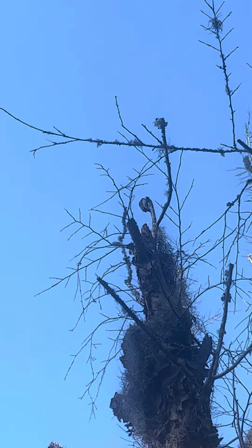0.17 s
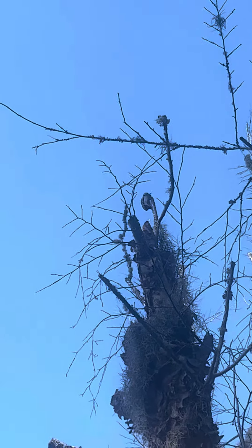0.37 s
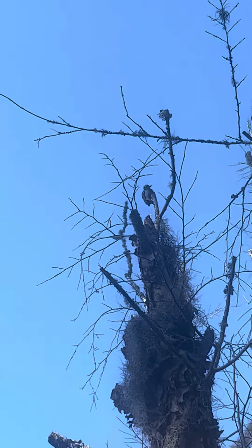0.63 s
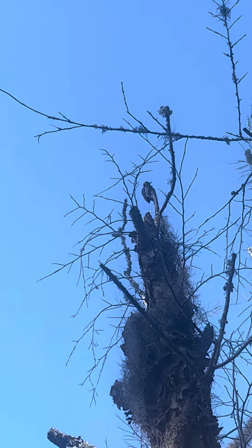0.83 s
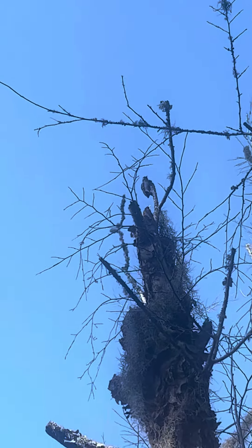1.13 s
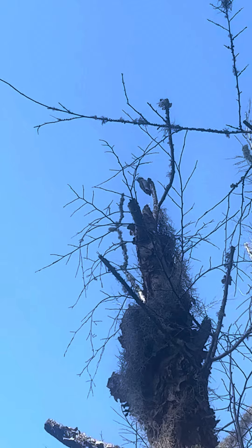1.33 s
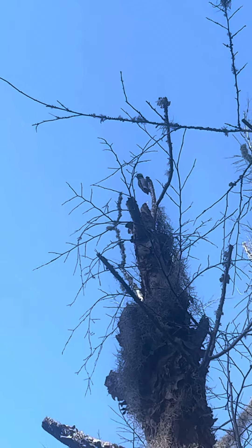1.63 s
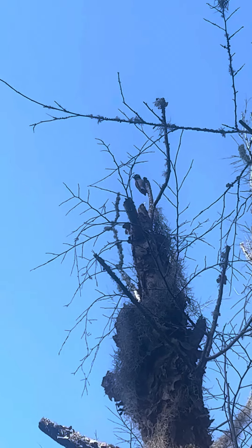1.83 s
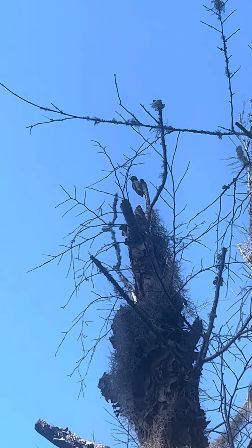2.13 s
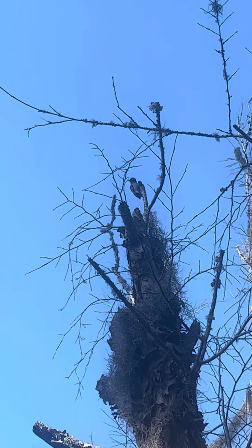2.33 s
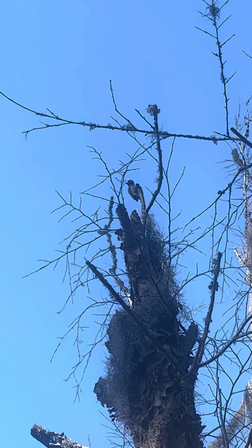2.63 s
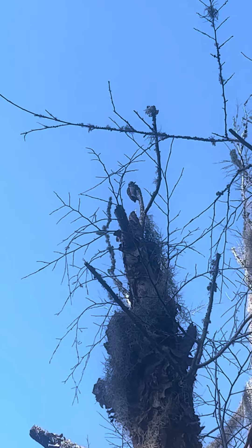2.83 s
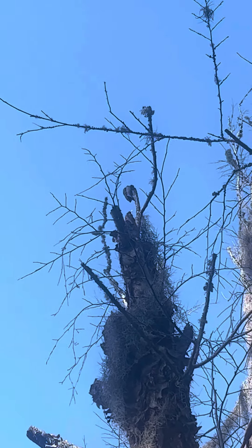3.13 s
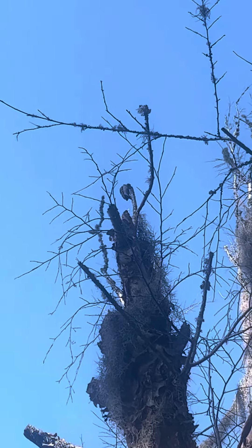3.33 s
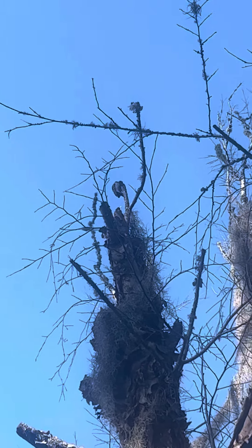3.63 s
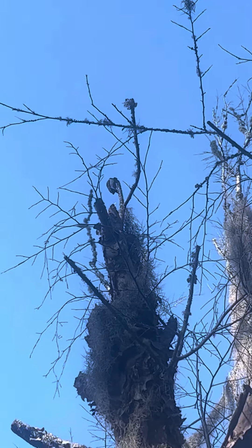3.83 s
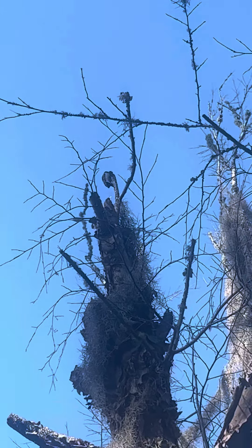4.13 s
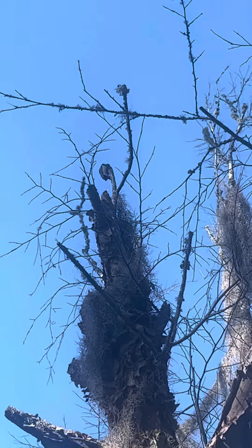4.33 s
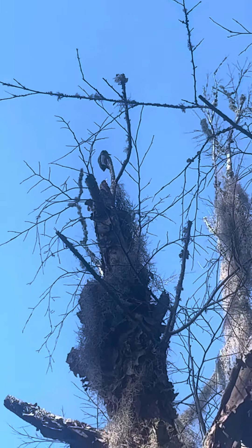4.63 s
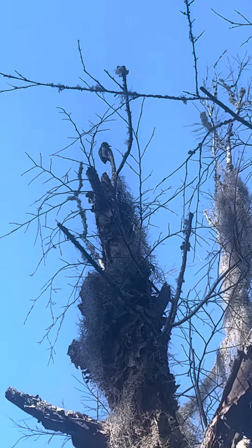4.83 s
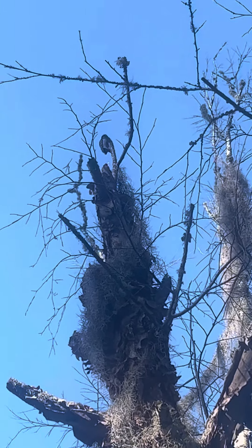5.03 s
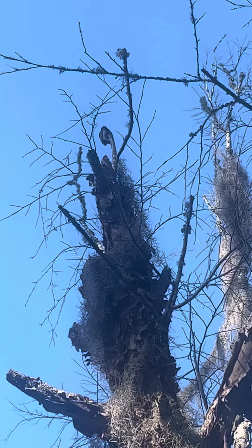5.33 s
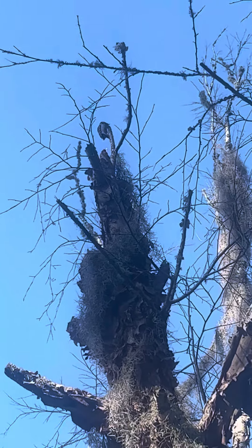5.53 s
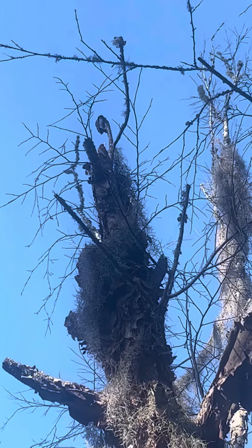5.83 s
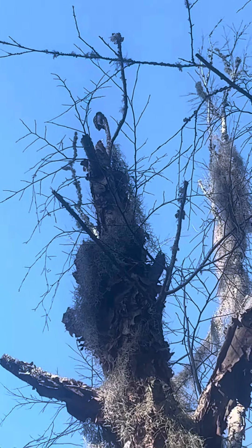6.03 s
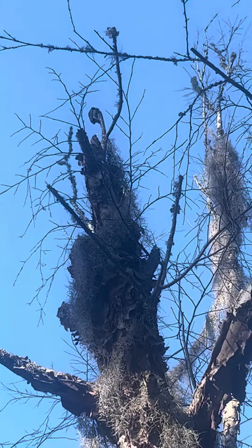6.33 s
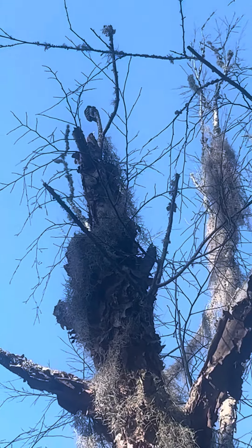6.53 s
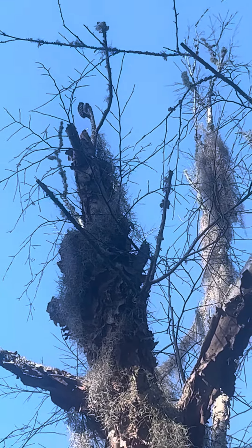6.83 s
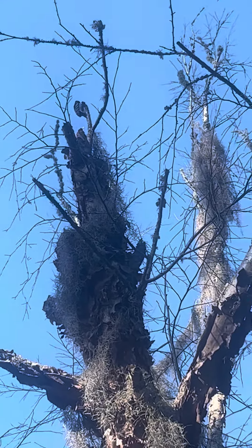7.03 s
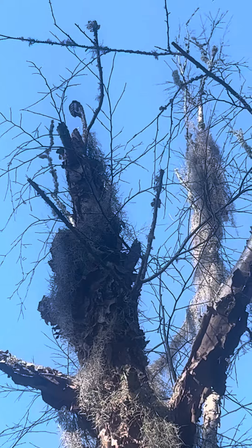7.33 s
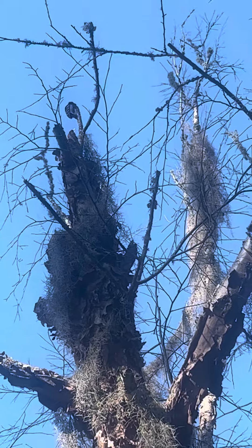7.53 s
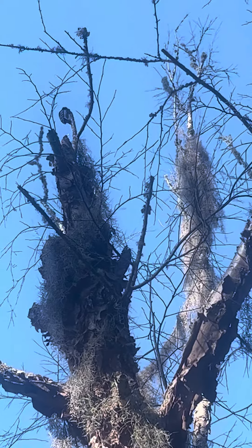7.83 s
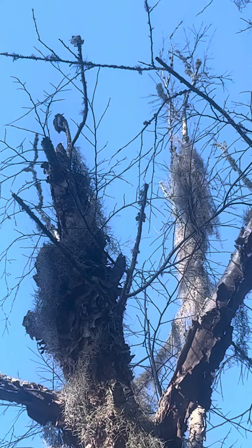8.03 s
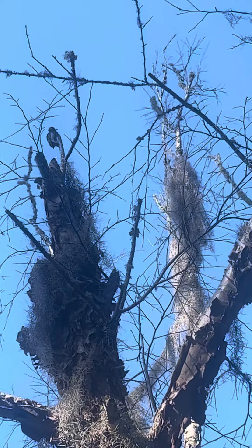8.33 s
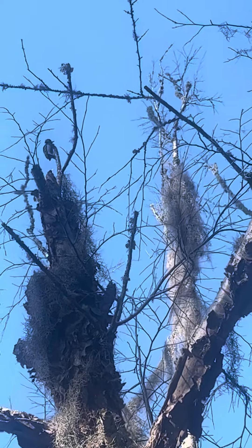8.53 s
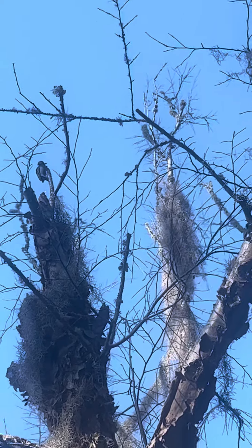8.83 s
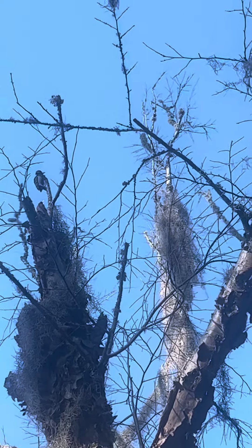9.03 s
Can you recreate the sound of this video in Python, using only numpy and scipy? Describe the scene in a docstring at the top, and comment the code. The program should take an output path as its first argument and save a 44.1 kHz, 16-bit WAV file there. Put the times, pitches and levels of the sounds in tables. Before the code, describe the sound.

Under a nest tree outdoors, young woodpeckers chirp almost continuously: tiny, dry, high notes with a cracked onset and quick drop, three to five per second. They are high at 0-1 s, lower and rougher from 1.2 to 3 s, high again until about 8 s, spaced wider around 4-6 s, then lower to the end at 9 s. Faint extra chirps slip between. Behind, a soft low hoot repeats about every 1.1 s. A distant songbird gives falling whistles before 0.7 s and a busy phrase from 4.8 to 6.4 s. Nasal rising whines come at 0.1, 2.2-3.3 and, often, 6.4-8.5 s. Woods echo lightly. Wind rumble builds after 0.5 s, handling knocks cluster at 3.4-3.7 s, the rumble drops around 3.9-4.5 s and returns; a soft knock lands at 7.2 s. Steady hiss, faint leaves and distant hum, dipping from 3 to 5 s, fill the close handheld stereo pickup.

```python
"""From the first second, young woodpeckers chirp in a nest tree, heard from below by a pair of ports.
Farther off one or two birds whine, a songbird sings and a low hoot repeats; the wood echoes all of these.
Wind rumbles at the ports over leaves, hiss and a distant hum, which sinks from 3 to 5 s and jumps back.
Knocks on the recorder start at 3.4 s, then the rumble drops for half a second; one more comes at 7.2 s.
Voices are bending stacks of sines with noisy breath, knocks are dying sines, and the air is shaped noise."""
import sys
import numpy as np
from scipy import signal
from scipy.fft import rfft, irfft, next_fast_len
from scipy.io import wavfile
from scipy.ndimage import uniform_filter1d

SR = 44100
rng = np.random.default_rng(int(sys.argv[2]) if len(sys.argv) > 2 else 0)


def master_out(mix):
    """Clip the mix to full scale and print it as 16-bit PCM to the path in sys.argv[1]."""
    frames = np.transpose(np.atleast_2d(mix))
    ceiling = np.clip(frames, -1, 1)
    pcm = np.round(ceiling * 32767).astype(np.int16)
    wavfile.write(sys.argv[1], SR, pcm)


N = 405279

# Nestlings, near: (start [s], voice, length [ms], top pitch [Hz], level of the second partial [dB])
CHIRPS = [(0.0318, "high", 18.2, 3514, -39.5), (0.2778, "high", 17, 3544, -37.5),
          (0.4649, "high", 10.3, 3610, -35), (0.6729, "high", 13.4, 3620, -36.5),
          (0.8914, "high", 11.8, 3600, -35.5), (1.0026, "faint", 17, 3310, -53.5),
          (1.231, "low", 15, 3053, -32.5), (1.488, "low", 15, 3320, -32.5), (1.6776, "low", 9.8, 3233, -31),
          (1.808, "faint", 17, 3450, -51), (1.8831, "low", 11, 3236, -30), (2.0497, "low", 11.6, 3275, -32),
          (2.2712, "low", 11.5, 3236, -31), (2.5067, "low", 14, 3270, -32), (2.7242, "low", 11, 3245, -30),
          (2.897, "faint", 18.5, 3460, -57.5), (2.9682, "low", 14.2, 3170, -31),
          (3.1772, "high", 14.2, 3594, -38.5), (3.411, "faint", 19, 3360, -54),
          (3.4351, "high", 15, 3645, -38), (3.903, "faint", 23, 3340, -53),
          (3.9479, "high", 15.3, 3600, -40), (4.4084, "high", 13.5, 3544, -40),
          (4.6518, "high", 16.7, 3603, -41), (4.8788, "high", 18, 3554, -41.5),
          (4.919, "faint", 20, 3380, -47), (5.255, "high", 17.7, 3500, -42.5),
          (5.6226, "high", 14.7, 3480, -37.5), (5.9524, "high", 18, 3470, -42),
          (6.3225, "high", 18, 3500, -38.5), (6.5296, "faint", 14, 3520, -49.5),
          (6.7077, "high", 17.7, 3540, -38.5), (6.9366, "high", 20, 3440, -41.5),
          (7.1611, "high", 16.3, 3470, -40), (7.3427, "high", 16.5, 3545, -38),
          (7.5632, "high", 17, 3510, -39), (7.9528, "high", 17.5, 3585, -38.5),
          (8.1628, "low", 17, 3135, -33.5), (8.3424, "low", 12.4, 3197, -32),
          (8.5195, "low", 12, 3140, -34), (8.7375, "low", 13, 3110, -32.5),
          (8.9405, "low", 13, 3076, -32.5), (9.1675, "low", 18, 3170, -33.5)]
# The nestlings' voices: (share of the chirp spent rising, first, third and fourth partial against the
# second [dB], depth of the rise in the pitch arch, both ends against the top [dB], usual level [dB])
VOICES = {"high": (0.52, -8.5, -27, -25, .1, 0, -40), "low": (0.06, -15.5, -15, -25, 0.17, -4.5, -32),
          "faint": (0.3, -5.5, -19, -36, 0.3, -4.5, -57.5)}
# What throat and nest hole pass on: (frequency [Hz], level [dB])
BEAK = [(1800, -16), (3000, -9), (4000, -5), (5300, 1), (6300, 0), (7100, -2), (8200, -12), (9300, -14),
        (10600, -22), (12500, -26), (14200, -24), (15600, -26)]
# Colour of the breath in the chirp: (frequency [Hz], relative level [dB])
CRACKLE = [(1800, -4.5), (3000, 0.5), (5000, 8), (6500, 7.5), (8000, -8), (10400, -14), (13000, -14),
           (15600, -8)]
# Cracked onset against the top, by voice: level [dB]
CRACK_DB = {"high": -7, "low": -8.5, "faint": -9}
# Whining birds, two at times, farther off: (start [s], length [s], start pitch [Hz], end pitch [Hz],
# level before its swell [dB], change of the partials under the sixth [dB])
WHINES = [(.08, 0.2, 439, 552, -67.5, -1), (2.18, .22, 448, 598, -69.5, -1),
          (2.53, 0.18, 476, 559, -70.5, -2.5), (2.8, 0.16, 465, 545, -68, -6),
          (3.09, 0.19, 477, 559, -66.5, -10), (6.4, 0.26, 436, 563, -67, -1),
          (6.73, 0.2, 470, 545, -68, 1.5), (6.75, 0.26, 447, 522, -68, -8),
          (7.02, 0.2, 428, 565, -63, -4.5), (7.3, .19, 430, 582, -63.5, -6.5),
          (7.56, 0.24, 477, 567, -62, -9.5), (7.87, 0.27, 405, 565, -64, -8),
          (7.92, 0.2, 491.6, 538, -67.5, -7), (8.21, 0.27, 420, 556, -64.5, -7.5)]
# Partials of the whine: (frequency [Hz], level [dB])
WHINE_THROAT = [(1500, -24), (2150, -3), (2600, -10), (3150, 0), (3700, -17), (4400, -15), (5500, -19),
                (7500, -17), (9500, -21), (13000, -34)]
# Colour of the breath in the whine: (frequency [Hz], relative level [dB])
RASP = [(2500, -30), (4500, -32), (5800, -12), (7500, -5), (9300, -17), (10400, -47), (12500, -25.5),
        (14500, -29)]
# Songbird notes, farther off: (start [s], syllable, length [s], level at the start [dB])
SONG = [(.12, "fall", 0.089, -61.5), (.32, "slide", 0.054, -60), (.57, "fall", 0.087, -60.5),
        (4.76, "slide", .035, -68), (4.83, "tick", 0.024, -65), (4.985, "fall", 0.089, -60.5),
        (5.175, "slide", 0.063, -62), (5.29, "lift", 0.061, -62), (5.34, "drop", 0.045, -60),
        (5.41, "fall", 0.095, -61), (5.69, "tick", 0.019, -56), (5.72, "lift", 0.052, -61),
        (5.767, "drop", .028, -57.5), (5.84, "fall", .1, -59.5), (6.045, "slide", 0.038, -57.5),
        (6.115, "tick", 0.046, -60), (6.155, "lift", 0.06, -64), (6.205, "drop", 0.032, -58.5),
        (6.285, "fall", .1, -60.5), (7.2, "low", 0.12, -69), (7.66, "low", 0.1, -68)]
# The songbird's syllables: (start pitch [Hz], end pitch [Hz])
SYLLABLES = {"fall": (2900, 1680), "slide": (4380, 3700), "lift": (2750, 3200), "drop": (3850, 3200),
             "tick": (4800, 5100), "low": (2100, 1750)}
# Hoots, farther off: (start [s], level once swollen [dB])
HOOTS = [(.14, -65.5), (1.3, -64), (2.44, -63), (3.56, -66), (4.6, -69.5), (5.7, -64.5), (6.79, -65),
         (8.1, -64)]
# Knocks at the recorder: (time [s], relative level [dB], relative thump [dB], tilt of the ring [dB/octave])
KNOCKS = [(3.416, -26.5, -2, 3.5), (3.426, -35, 7, 5), (3.484, -25, -18, 0), (3.496, -30, -12, 1),
          (3.506, -34, 4.5, -3), (3.737, -42, -12, 5), (7.169, -34.5, 3, -11)]
# Ringing of the case: (nominal frequency [Hz], level [dB], time to fall 60 dB [s])
CASE = [(470, -14.5, 0.096), (836, 2, 0.026), (1148, 2.5, 0.02), (1472, -3, 0.036)]
# Thump of the hand-held body: (nominal frequency [Hz], level [dB], time to fall 60 dB [s])
THUMP = [(67.6, 5, 0.029), (167, -4, 0.12), (280, -25, 0.082)]
# Echo of the trees: (frequency [Hz], time to fall 60 dB [s])
WOOD = [(500, 1), (3000, 0.69), (7000, 0.49), (14000, 0.38)]
# Wind at the ports: (time [s], rumble level [dB])
WIND = [(0.0, -57.5), (0.2, -57.5), (0.6, -48), (1.1, -46), (1.7, -46.5), (2.5, -48.5), (3.3, -45.5),
        (3.55, -43.5), (3.9, -61.5), (4.48, -61.5), (4.8, -53), (5.3, -50.5), (5.95, -46), (6.4, -48.5),
        (6.78, -45.5), (7.0, -48.5), (8.2, -48), (9.19, -47)]
# Colour of the wind rumble: (frequency [Hz], relative level per Hz [dB])
RUMBLE = [(8.8, -36.5), (15, -22), (36, -0.5), (64, 6), (130, -4), (183, -11.5), (400, -28), (520, -55),
          (880, -120)]
# Colour of the distant hum: (frequency [Hz], relative level per Hz [dB])
HUM = [(120, -28.5), (200, -4), (466, -11), (603, -10.5), (914, -13), (1110, -20), (1190, -30),
       (1300, -23.5), (1690, -54), (2860, -120)]
# Colour of the hiss: (frequency [Hz], relative level per Hz [dB])
HISS = [(650, -31), (1100, -11.5), (1200, -10.5), (1360, 3.5), (1470, 4), (1590, 2), (1870, -15.5),
        (2200, -24), (2860, -34), (4840, -120)]
# Colour of the leaves: (frequency [Hz], relative level per Hz [dB])
LEAVES = [(1120, -15), (1900, -4), (2720, -15.5), (5130, -18), (5850, -31), (6270, -31), (7090, -5),
          (7680, -30), (10300, -36), (12700, -26.5), (15500, -53)]
# Air noise at the two ports: (frequency [Hz], share unrelated between them)
APART = [(60, 0.033), (300, 0.35), (800, 0.7), (1500, 0.43), (2100, 0.2), (15000, 0.73)]
# Arrival at the ports: (frequency [Hz], phase by which left leads [rad])
LEAD = [(0, 0), (520, -.7), (1200, -.4), (2580, 2.2), (3960, .9), (5000, 1.4), (5700, 3), (6400, 3.75),
        (7060, 5), (7750, 6.2), (8400, 6.5), (10100, 9.4), (11100, 10.3), (11900, 12.5), (13000, 12.7),
        (14300, 15.4), (15700, 16.1)]
# Balance of the ports: (frequency [Hz], left over right [dB])
TILT = [(300, 0), (700, -2.5), (1550, 4.7), (2400, 0)]

BRIGHTEN = 0.54  # dB the first partial falls behind for each dB of extra effort
DULLED_FROM_S, DULLED_DB = 6.1, -16.5  # from then on the high voice has weaker top partials
CRACK_HZ, CRACK_MS = 2478, 2.17  # the voice breaks in on this pitch; time its level holds before the jump
CLIMB_BEND = .48  # under 1: the whine climbs fast at first, then slowly
HOOT_S, HOOT_FROM_HZ, HOOT_HZ = .32, 605, 663
HUM_DB, HISS_DB, LEAVES_DB = -60, -61.5, -75.5
HUM_SINKS_S, HUM_BACK_S, HUM_SINK_DB = 3, 5, -5.5
BASS_CUT_HZ, EDGE_HZ = 45.5, 15750


def chirp(s, bird, length_ms, top_hz, db):
    """A near nestling's pitch arch: a cracked, noisy onset, a clean top, and a steep rough drop."""
    rising, first_db, third_db, fourth_db, climb, fade_db, usual_db = VOICES[bird]
    if bird == "high" and s > DULLED_FROM_S:
        third_db, fourth_db = third_db + DULLED_DB, fourth_db + DULLED_DB
    rise_ms, fall_ms = rising * length_ms, (1 - rising) * length_ms
    lead_ms, drop_ms = 18, 18
    t = np.arange(-lead_ms, rise_ms + fall_ms + drop_ms, 1000 / SR)  # ms
    early, late = np.maximum(-t, 0), np.maximum(t - rise_ms - fall_ms, 0)
    fallen = np.clip((t - rise_ms) / fall_ms, 0, None)

    arch = climb * np.clip(1 - t / rise_ms, 0, 1) ** 3.18 + .12 * fallen ** 3.0
    hz = top_hz * (1 - 0.6 * np.tanh(arch / .48))
    cracked = uniform_filter1d(1. * (t < 0), size=50)
    hz = hz + cracked * (CRACK_HZ - hz)
    outside = np.clip(early / 2.4 + late / 3.2, 0, 1)  # the folds lose their regular beat
    hz = hz * (1 + (0.0079 + 0.043 * outside) * wobble(len(t), size=14))

    at_top = [first_db - BRIGHTEN * (db - usual_db), 0, third_db, fourth_db, fourth_db - 3.0]
    levels = []
    for k, level in enumerate(at_top, 1):
        passed_db = read(BEAK, k * hz) - read(BEAK, k * top_hz)
        levels.append(level + passed_db - 90 * (k * hz > EDGE_HZ))

    fade = fade_db * np.clip(np.maximum(fallen, 1 - t / rise_ms), 0, 1) ** 2
    tone_db = fade + cracked * CRACK_DB[bird]
    tone_db = tone_db - 6 * np.maximum(early - CRACK_MS, 0) - 2.2 * late
    tone_db = tone_db + (.9 + 2.2 * outside) * wobble(len(t), size=40)
    breath_db = -13 + 11 * outside - 1.3 * early - 1.4 * late + 2.5 * wobble(len(t), size=30)
    tone = gain_of(tone_db) * partials(hz, levels)
    breath = gain_of(breath_db + fade) * coloured(len(t), CRACKLE)
    return s - lead_ms / 1000, gain_of(db) * (tone + breath) * signal.windows.tukey(len(t), .3)


def whine(s, length, from_hz, to_hz, db, low_db):
    """A rising nasal stack of partials with grainy breath puffing through on each cycle."""
    u = np.linspace(0, 1, round(length * SR))
    hz = from_hz + (to_hz - from_hz) * u ** CLIMB_BEND
    hz = hz * (1 + 0.0048 * wobble(len(u), size=120) + 0.00595 * wobble(len(u), size=1200))
    levels = []
    for k in range(1, 24):
        level = read(WHINE_THROAT, k * hz) + low_db * (k < 6) - 3.9 * (k == 7)
        levels.append(level + 2.2 * wobble(len(u), size=600))
    puffs = 1 + 0.49 * np.cos(2 * np.pi * np.cumsum(hz) / SR)
    grain = gain_of(12.0 + 1.9 * wobble(len(u), size=300))
    voice = partials(hz, levels) + puffs * grain * coloured(len(u), RASP)
    swell = gain_of(db + 1.4 * (u + 1.5))
    return s, swell * voice * signal.windows.tukey(len(u), .25)


def note(s, syllable, length, db):
    """One gliding songbird whistle, a single sine that fades unevenly as it goes."""
    hz = np.geomspace(*SYLLABLES[syllable], round(length * SR))
    level = db - np.linspace(0, 5, len(hz)) + 3.2 * wobble(len(hz), size=100)
    return s, partials(hz, [level]) * signal.windows.tukey(len(hz), .4)


def hoot(s, db):
    """A soft low tone, a single sine that slides up to its pitch and swells."""
    u = np.linspace(0, 1, round(HOOT_S * SR))
    hz = HOOT_HZ + (HOOT_FROM_HZ - HOOT_HZ) * np.exp(-u / .3)
    return s, partials(hz, [db - 4 * (1 - u) ** 2]) * signal.windows.tukey(len(u), .25)


def knock(s, db, thump_db, tilt_db):
    """A soft blow rings the recorder's case over a low thump, both as dying sines."""
    t = np.arange(6000) / SR
    case, thump = ring(t, CASE), ring(t, THUMP)
    onset = np.sin(np.pi / 2 * np.minimum(t / 0.0018, 1)) ** 2
    blow = onset * signal.windows.tukey(2 * len(t), .5)[len(t):]
    return s - .0005, gain_of(db - 8.5) * blow * (tilted(case, tilt_db) + gain_of(thump_db + 5.0) * thump)


def ring(t, modes):
    """Sums dying sines, each a little off its nominal pitch and at a random phase."""
    total = 0
    for hz, level, t60 in modes:
        turns = hz * rng.uniform(0.91, 1.014) * t
        total = total + gain_of(level - 60 * t / t60) * np.sin(2 * np.pi * (turns + rng.random()))
    return total


def tilted(x, tilt_db):
    """Leans a spectrum about 800 Hz, by dB per octave between 300 and 2000 Hz."""
    hz = np.clip(np.fft.rfftfreq(len(x), 1 / SR), 300, 2000)
    return irfft(rfft(x) * gain_of(tilt_db * np.log2(hz / 800)), len(x))


def wood(x, apart=.6):
    """Sparse echoes of random sign from trunks and ground, each band dying at its own speed."""
    taps = np.zeros((2, SR))
    at = np.arange(500, SR - 20, 20) + rng.integers(0, 20, (2, (SR - 501) // 20))
    np.put_along_axis(taps, at, rng.choice([-1., 1.], at.shape), 1)
    taps[1] = np.sqrt(1 - apart ** 2) * taps[0] + apart * taps[1]
    hz, t, z = signal.stft(taps, SR, nperseg=256)
    fade = gain_of(-60 * t / read(WOOD, hz)[:, None])
    fade = fade + gain_of(14.5 - 60 * t / 0.05)  # near branches answer first
    tail = signal.istft(z * fade, SR, nperseg=256)[1]
    return signal.fftconvolve(x[None], tail / np.linalg.norm(tail[0]), axes=1)[:, :N]


def air():
    """Rumble, hum, hiss and leaves: random short-time spectra with their own levels and shared swells."""
    frames, hz = N // 256 + 5, np.fft.rfftfreq(1024, 1 / SR)
    a, b, c, d, patches = rng.standard_normal((frames, 513, 5)).T  # each (frequency, frame)
    patches = uniform_filter1d(uniform_filter1d(patches, 6, 0), 10, 1)
    patches = patches / patches.std()
    t = np.arange(frames) * 256 / SR
    layers = [(RUMBLE, np.interp(t, *np.transpose(WIND)), 1.44),  # (colour, level [dB], patchiness [dB])
              (HUM, HUM_DB + hum_sink(t), 0.67),
              (HISS, HISS_DB, 0.35),
              (LEAVES, LEAVES_DB, 2.7)]
    power = 0
    for shape, db, patchy_db in layers:
        colour = gain_of(read(shape, hz)) ** 2
        swell_db = db + patchy_db * patches
        power = power + (colour / colour.sum())[:, None] * gain_of(swell_db) ** 2
    apart = np.clip(read(APART, hz), 0, 1)[:, None]
    left = a + 1j * b
    right = np.sqrt(1 - apart ** 2) * left + apart * (c + 1j * d)
    z = np.sqrt(power) * np.array([left, right])
    return np.sqrt(3 / 2) * signal.istft(z, nperseg=1024, noverlap=768)[1][:, :N]


def hum_sink(t):
    """The hum's level sinks steadily in dB, then jumps back at once."""
    sinking = (t >= HUM_SINKS_S) & (t < HUM_BACK_S)
    return sinking * HUM_SINK_DB * (t - HUM_SINKS_S) / (HUM_BACK_S - HUM_SINKS_S)


def gain_of(db):
    """Decibels to gain."""
    return 10 ** (np.asarray(db) / 20)


def read(points, hz):
    """Reads a table on a log-frequency axis."""
    f, value = np.transpose(points)
    return np.interp(np.log(hz + 1), np.log(f + 1), value)


def wobble(count, size):
    """Smooth chance of standard deviation 1."""
    x = uniform_filter1d(uniform_filter1d(rng.standard_normal(count), size), size)
    return x / x.std()


def partials(hz, levels_db):
    """Harmonic sines on a pitch curve; 0 dB gives each partial rms 1."""
    turns = 2 * np.pi * np.cumsum(hz) / SR
    return sum(np.sqrt(2) * gain_of(db) * np.sin(k * turns) for k, db in enumerate(levels_db, 1))


def coloured(count, shape):
    """Noise whose spectrum follows a table; 0 dB everywhere gives rms 1."""
    colour = gain_of(read(shape, np.fft.rfftfreq(count, 1 / SR)))
    return irfft(rfft(rng.standard_normal(count)) * colour, count)


def add(mix, s, sound):
    """Mixes a sound in at time s."""
    part = mix[round(s * SR):][:len(sound)]
    part += sound[:len(part)]


def play(rows, source):
    """Plays every row of a table through its source."""
    mix = np.zeros(N)
    for row in rows:
        add(mix, *source(*row))
    return mix


def scene():
    """Near chirps, farther birds, their echo in the wood, knocks at the recorder, and air."""
    chirps, whines = play(CHIRPS, chirp), play(WHINES, whine)
    song, hoots = play(SONG, note), play(HOOTS, hoot)
    # the near chirps excite the wood least for their level
    to_wood = gain_of(-13.0) * chirps + gain_of(-3) * whines + gain_of(-6) * song + gain_of(-12) * hoots
    return chirps + whines + song + hoots + wood(to_wood) + play(KNOCKS, knock) + air()


def record(dry):
    """The two ports differ in arrival and level by frequency; then the bass cut and the band limit."""
    size = next_fast_len(N + 4096)
    hz = np.fft.rfftfreq(size, 1 / SR)
    # each port takes half of the difference
    half = gain_of(read(TILT, hz) / 2) * np.exp(.5j * np.interp(hz, *np.transpose(LEAD)))
    ports = irfft(rfft(dry, size) * np.array([half, 1 / half]), size)[:, :N]
    bass_cut = signal.butter(3, BASS_CUT_HZ, "highpass", fs=SR, output="sos")
    band_limit = signal.firwin(511, EDGE_HZ, window=("kaiser", 9), fs=SR)
    return signal.oaconvolve(signal.sosfilt(bass_cut, ports), band_limit[None], "same")


dry = scene()
out = record(dry)
master_out(out)
```